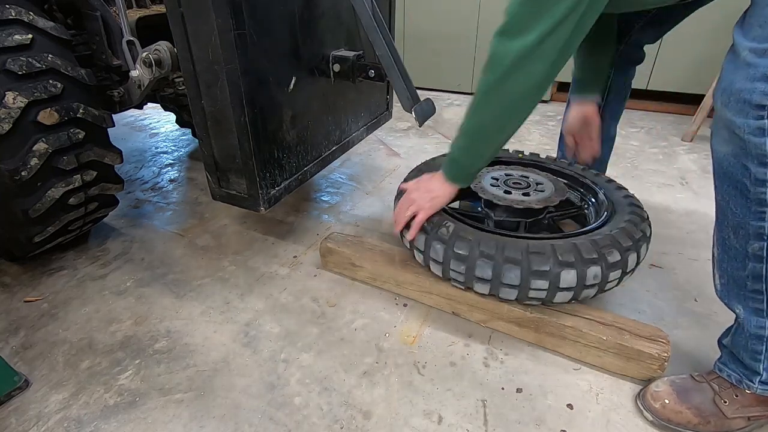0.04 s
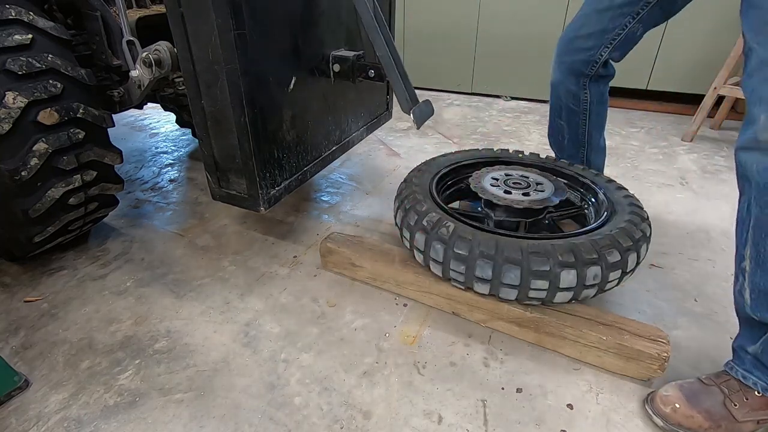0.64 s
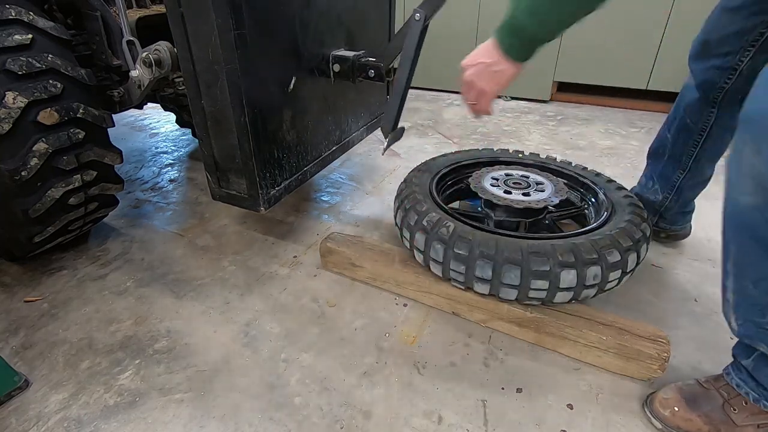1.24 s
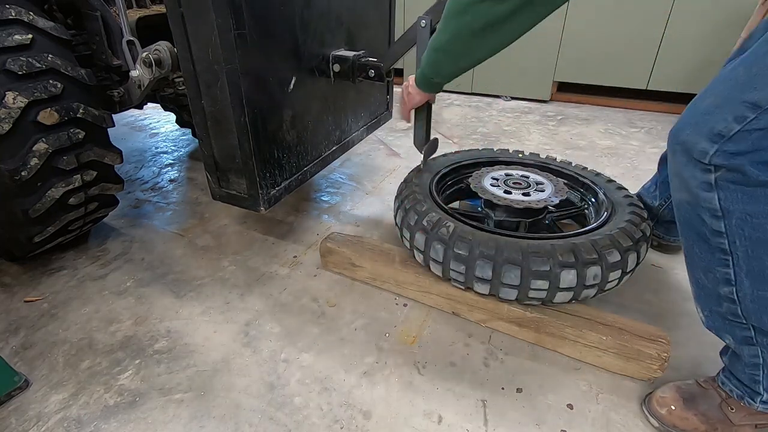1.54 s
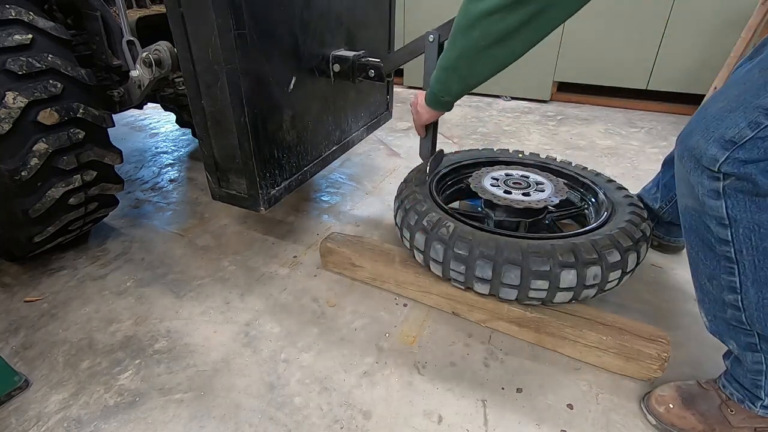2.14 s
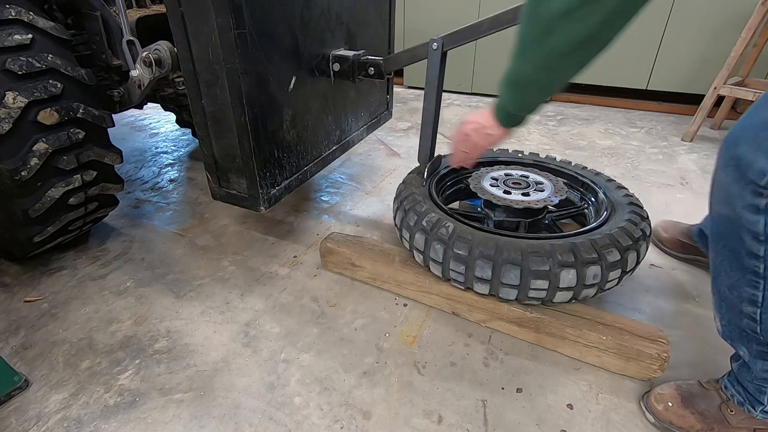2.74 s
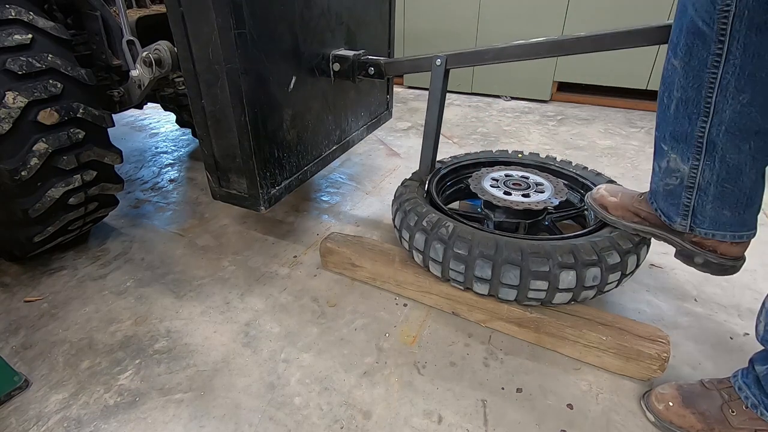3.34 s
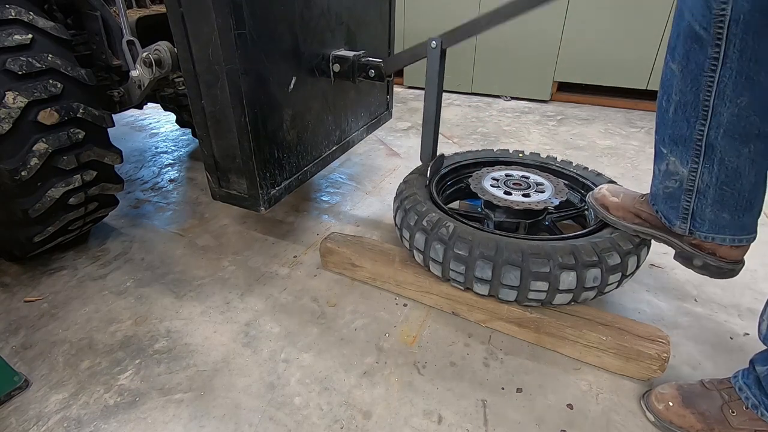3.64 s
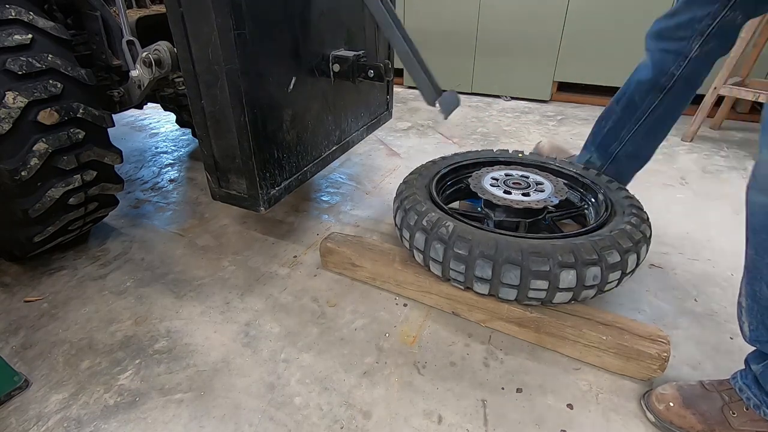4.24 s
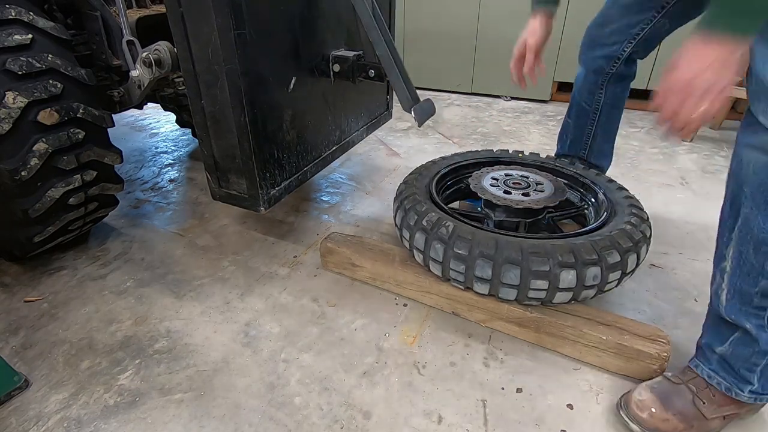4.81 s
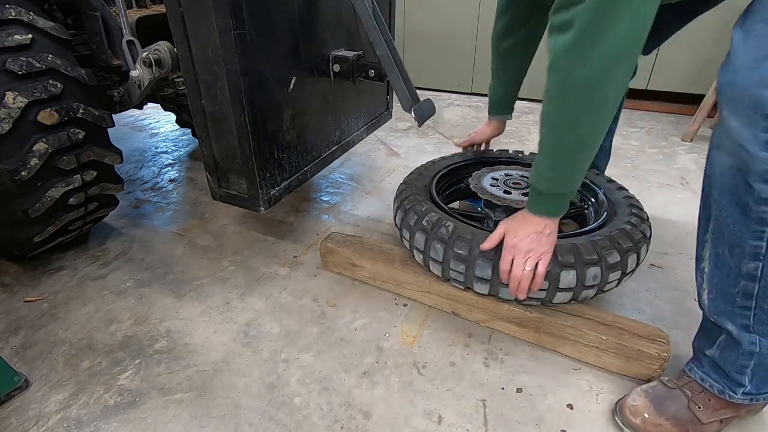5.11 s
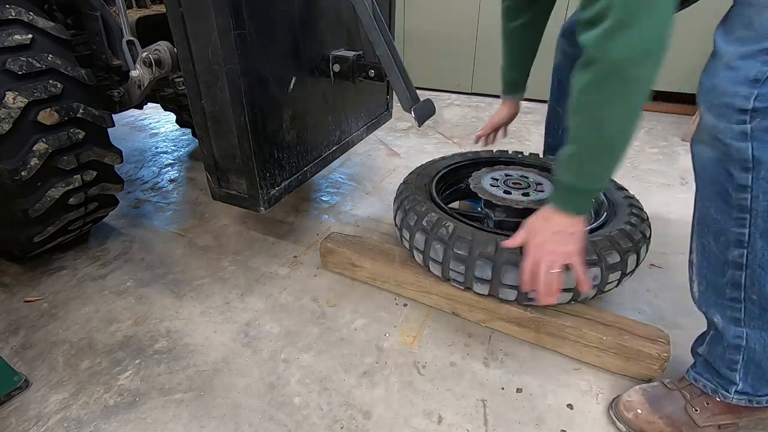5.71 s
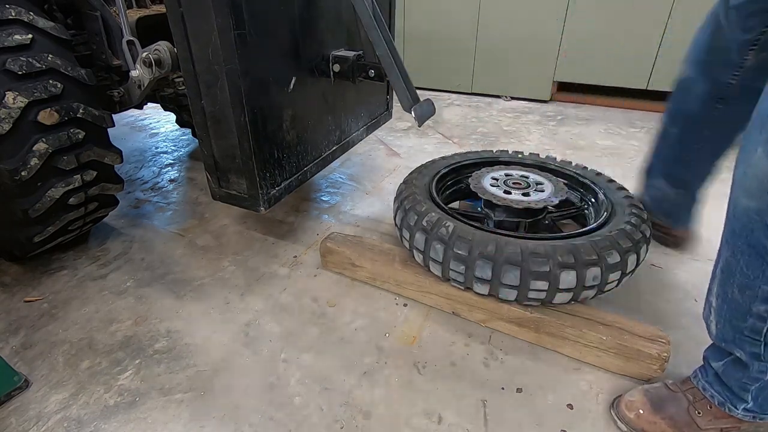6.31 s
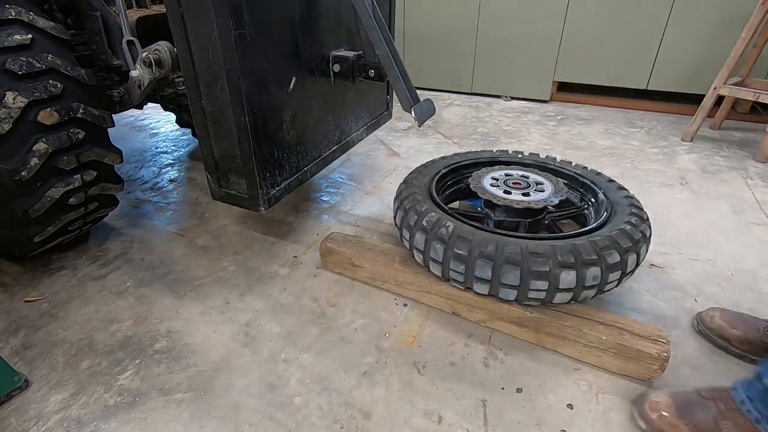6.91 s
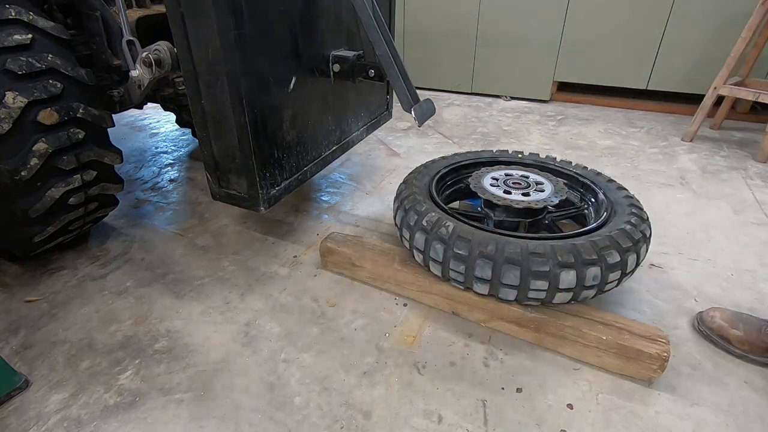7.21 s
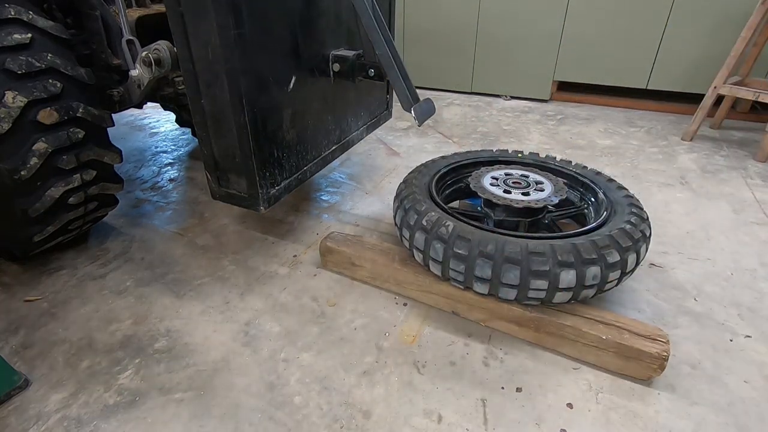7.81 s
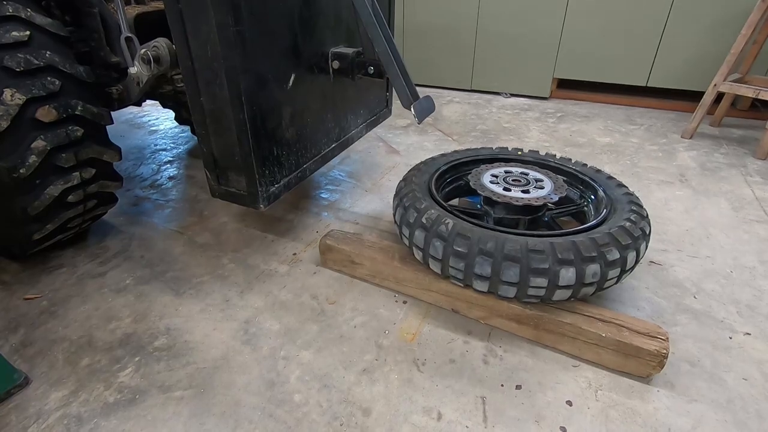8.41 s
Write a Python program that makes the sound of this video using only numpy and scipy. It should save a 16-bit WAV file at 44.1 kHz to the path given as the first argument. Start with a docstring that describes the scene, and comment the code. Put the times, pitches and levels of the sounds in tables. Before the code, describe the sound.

In a reverberant workshop, a wheel lands on wood with a sharp knock and a boom. Light clinks of a loose steel hinge lead into rubber creaking under a lever, with faint high whistles and a thud. The lever releases with a clank, then squeaks and bangs on a hollow steel box. Palms pat the tyre and boots scuff over concrete, before fingers scrape and tap right at the microphone.

```python
"""A knock and a hollow thump ring through a workshop: a motorcycle wheel drops on a wooden beam. A hinged steel
lever is pressed into the tyre; stick-slip friction makes the rubber creak and groan. Faint, very high tones
glide up and down across each other. The lever springs free, squeaks on its pivot and clanks against its steel
box, exciting the modes of both. Boots thud and scuff on concrete, denim swishes and palms slap the tyre. At the
end a hand rubs and taps the camera, close and mostly on the right."""
import sys
import numpy as np
from scipy import signal
from scipy.fft import rfft, irfft, next_fast_len
from scipy.io import wavfile
from scipy.ndimage import uniform_filter1d

SR = 44100
rng = np.random.default_rng(int(sys.argv[2]) if len(sys.argv) > 2 else 0)


def persist_wave(psi):
    """Save psi, clipped to +-1, as 16-bit WAV."""
    counts = np.round(np.clip(psi, -1, 1) * 32767).astype(np.int16)
    wavfile.write(sys.argv[1], SR, np.atleast_2d(counts).T)


N = 377055
TIME = np.arange(N) / SR
AGE = np.arange(SR) / SR  # the second that follows an impact

# spectra of loose steel joints, slipping rubber and a dull bump: f/Hz, level/dB
CHATTER_SPECTRUM = [(40, -43), (170, -5.5), (700, -4.5), (1300, -2), (2200, -1.5), (3300, -3.5), (5400, -3),
                    (7000, -14.5), (9300, -21), (11000, -38.5), (15000, -50.5)]
RUBBER_SPECTRUM = [(60, -45.5), (300, -14), (900, 3.5), (1400, -3), (2300, 0), (3400, 3), (4200, 0.5),
                   (5800, -4), (7500, -17.5), (10000, -22.5), (14000, -42)]
BUMP_SPECTRUM = [(20, -1.5), (55, -0.5), (100, -8.5), (250, -14), (600, -35), (2000, -68)]
# modes of the lever's steel foot, damped by the rubber: f/Hz, level/dB, t60/s
FOOT_MODES = [(1400, -5, .03), (2130, -6, .03), (2480, -7, .02), (3350, 0, .03), (4080, -1, .03),
              (4930, -6, .02)]


def undb(db):
    """Decibels to amplitude ratio."""
    return 10 ** (np.asarray(db) / 20)


def unit(x):
    """Normalise to rms 1."""
    return x / np.sqrt(np.mean(x ** 2))


def add(track, t, sound):
    """Superpose a sound on the track at time t."""
    start = max(int(t * SR), 0)
    track[start:start + len(sound)] += sound[:N - start]


def curve(rows, column=1):
    """Linear interpolation of a table column in time."""
    rows = np.array(rows)
    return np.interp(TIME, np.sort(rows[:, 0]), rows[:, column])


def swell(rows):
    """Envelope from rows of t/s, f/Hz, level/dB; silent outside them."""
    inside = (TIME >= rows[0][0]) & (TIME <= rows[-1][0])
    return undb(curve(rows, column=2)) * uniform_filter1d(inside * 1., size=200)


def fade(t60):
    """Exponential decay: 60 dB in t60 seconds."""
    return np.exp(-np.log(1000) * AGE / max(t60, .002))


def stroke(t, length_s, attack_s, t60):
    """Envelope of a sliding movement: linear rise, hold, exponential decay."""
    rise = np.clip((TIME - t) / attack_s, 0, 1)
    return rise * np.exp(-np.log(1000) * np.clip((TIME - t - length_s) / t60, 0, 10))


def strokes(rows, attack_s, t60):
    """Incoherent sounds add in power; rows of t/s, length/s, level/dB."""
    return np.sqrt(sum((undb(db) * stroke(t, length_s, attack_s, t60)) ** 2 for t, length_s, db in rows))


def wander(rate):
    """Smooth random fluctuation of rms 1, changing about rate times a second."""
    hold = int(SR / rate)
    steps = np.repeat(rng.standard_normal(N // hold + 1), hold)
    return unit(uniform_filter1d(steps, hold)[:N])


def slips(rate, scatter_db):
    """Stick-slip impulses with log-normal intervals and sizes."""
    gap, size = rng.standard_normal((20000, 2)).T
    at = (np.cumsum(np.exp(.5 * gap)) * SR / rate).astype(int)
    return np.bincount(at[at < N], undb(scatter_db * size[at < N]), N)


def shade(x, points):
    """Zero-phase filter through points of f/Hz, gain/dB."""
    size = next_fast_len(len(x))
    octave = np.log2(np.maximum(np.fft.rfftfreq(size, 1 / SR), 1))
    hz, db = np.transpose(points)
    gain = undb(np.interp(octave, np.log2(hz), db))
    return irfft(rfft(x, size) * gain, size)[:len(x)]


def colour(x, points, tilt_db=0):
    """Spectral shaping with an extra tilt in dB per octave; rms 1."""
    return unit(shade(x, [(hz, db + tilt_db * np.log2(hz)) for hz, db in points]))


def burst(points, t60, tilt_db=0):
    """Dense, short-lived modes, evenly excited, merge into decaying coloured noise."""
    envelope = fade(t60)
    spectrum = rfft(rng.standard_normal(SR) * envelope)
    white = irfft(spectrum / (np.abs(spectrum) + 1e-12), SR)
    strongest_hz = max(points, key=lambda p: p[1])[0]
    onset = 1 - np.exp(-(2 * AGE * strongest_hz) ** 2)  # takes about one cycle
    sound = colour(white, points, tilt_db) * fade(4 * t60) * onset
    return unit(sound) * np.sqrt(np.mean(envelope ** 2))


def ring(modes, pitch=1, contact_s=.0001):
    """Free vibration as a sum of damped sinusoids; a longer contact softens the onset."""
    hz, db, t60 = np.transpose(modes)
    gains = undb(db) / np.sqrt(np.sum(undb(db) ** 2) / 2) * (-1) ** np.arange(len(hz))
    sound = sum(g * np.sin(2 * np.pi * f * pitch * AGE) * fade(d) for f, g, d in zip(hz, gains, t60))
    return sound * (1 - np.exp(-(AGE / contact_s) ** 2))


def struck(modes, favoured_hz, focus_db, relative_width=.015):
    """The point of impact favours some modes over others."""
    def nearness(hz):
        return np.exp(-(np.log(hz / np.array(favoured_hz)) / relative_width) ** 2).max()
    return [(hz, db + focus_db * nearness(hz), t60) for hz, db, t60 in modes]


def resonate(x, modes, width_hz, lift_db):
    """Forced response of modes broadened by contact damping; the energy of x is kept."""
    size = next_fast_len(len(x))
    f = np.fft.rfftfreq(size, 1 / SR)
    peaks = sum(undb(db) / (1 + 2j * (f - hz) / width_hz) for hz, db, _ in modes)
    response = irfft(rfft(x, size) * (1 + undb(lift_db) * peaks), size)[:len(x)]
    return unit(response) * np.sqrt(np.mean(x ** 2))


def wheel(crack_db=-13):
    """Contact time sets the attack: the hard rim knocks on wood at once, the soft tyre booms later."""
    # landing and bounces: t/s, thump/dB, knock/dB, tyre pitch ratio, knock pitch ratio
    landings = [(.003, -22.5, -21, 0.93, 1.0), (0.0204, -9.5, -3, 0.87, 0.97), (0.06, -21.5, -29, .9, .9),
                (.097, -25, -26, 0.87, .9)]
    # modes of the tyre with its air, and of the rim on the beam: f/Hz, level/dB, t60/s
    tyre_modes = [(69.3, -8, 0.31), (90, -15, 0.34), (112, -11.5, 0.16), (163, -7, 0.2), (194, -2.5, 0.087),
                  (241.5, 3.5, 0.083), (341, -11, 0.12)]
    beam_modes = [(580, 0, 0.014), (790, 5, 0.013), (1010, 2, 0.015), (875, -13, 0.035)]
    # crack of the wood: f/Hz, level/dB
    crack_spectrum = [(40, -19), (150, 3), (420, 1), (800, 0), (1100, 1), (1500, -11), (2600, -15),
                      (3700, -14), (4500, -27), (6500, -28.5), (12000, -60.5)]
    out = np.zeros(N)
    for t, thump_db, knock_db, tyre_pitch, knock_pitch in landings:
        thump = ring(tyre_modes, tyre_pitch, contact_s=.0043)
        crack = burst([(hz * knock_pitch, db) for hz, db in crack_spectrum], t60=.034)
        knock = ring(beam_modes, knock_pitch, contact_s=.00083) + undb(crack_db) * crack
        add(out, t, undb(thump_db) * thump + undb(knock_db) * knock)
    return out


def denim(gain_db=-2, flutter_db=2.1):
    """A brief burst of noise just before the wheel lands; after it, friction noise of moving cloth."""
    # the opening burst (first row), then the swishes: t/s, length/s, level/dB
    noises = [(0, 0.0022, -25.5), (0.084, 0.63, -64), (0.503, 0.13, -62), (0.667, 1, -59.5),
              (0.975, 0.056, -52.5), (1.15, 0.13, -55), (1.31, 0.45, -58.5), (4.159, 0.12, -62),
              (4.377, 0.17, -54), (5.101, 0.24, -62.5), (5.33, 0.17, -55.5), (5.5, 0.27, -65),
              (6.091, 0.069, -61), (6.167, 0.283, -51.5), (6.45, 0.33, -54.5), (6.945, 0.053, -51.5),
              (7.222, 0.52, -69), (7.609, 0.14, -55), (7.77, 0.37, -51)]
    # their common spectrum: f/Hz, level/dB
    spectrum = [(50, -48), (100, -17), (160, 9), (300, 2), (700, 2), (1600, 2.5), (4000, 1), (6000, 0.5),
                (7500, -11), (9300, -11.5), (11000, -27), (15000, -37.5)]
    gain = undb(gain_db + flutter_db * wander(45)) * strokes(noises, attack_s=.039, t60=.091)
    return gain * colour(rng.standard_normal(N), spectrum)


def room_air(level_db=-75, drift_db=.78):
    """Broadband background noise, faint and nearly steady."""
    # room tone: f/Hz, level/dB
    air_spectrum = [(30, -12), (100, -13), (200, -1), (600, -9), (2000, -12.5), (5500, -11), (9000, -24.5),
                    (13000, -51.5)]
    return undb(level_db + drift_db * wander(13)) * colour(rng.standard_normal(N), air_spectrum)


def workshop(x, build_s=.028, early_db=-9, early_t60=.17):
    """Reverberation: floor and machines reflect first, then the diffuse field builds and decays."""
    # the room: f/Hz, t60/s, late level/dB, left-right correlation
    room_bands = [(61.4, 0.049, -5, 1), (142, 0.47, -9, 0.93), (245, 0.77, -4.5, 0.93),
                  (610, 0.92, -5.5, 0.6), (1080, 0.94, -3, 0.2), (2030, 0.91, -4.5, 0.7),
                  (5200, 0.72, -6, 0.3), (9500, 0.37, 2.5, 0)]
    hz, *columns = np.transpose(room_bands)
    centres = np.log2(62.5) + np.arange(17) / 2  # half-octave bands
    octave = np.log2(np.maximum(np.fft.rfftfreq(SR, 1 / SR), 1))
    noise = rfft(rng.standard_normal((2, SR)))
    early = undb(early_db) * unit(fade(early_t60) * (AGE > .003))
    response = np.zeros((2, SR))
    for centre, band in zip(centres, np.eye(len(centres))):
        t60, late_db, alike = (np.interp(centre, np.log2(hz), c) for c in columns)
        mid, side = irfft(noise * np.interp(octave, centres, band), SR)
        pair = np.sqrt((1 + alike) / 2) * mid + np.sqrt((1 - alike) / 2) * np.array([side, -side])
        late = undb(late_db) * unit(fade(t60) * (1 - np.exp(-AGE / build_s)))
        response += pair * np.hypot(late, early) / np.sqrt(SR)
    return signal.fftconvolve(x[None], response, axes=1)[:, :N]


def wavering_tone(hz, gain, waver, overtones_db=(), flutter_db=2):
    """A tone under random frequency and amplitude modulation."""
    phase = 2 * np.pi * np.cumsum(hz * (1 + waver * wander(500))) / SR
    tone = np.sin(phase) + sum(undb(db) * np.sin(k * phase) for k, db in enumerate(overtones_db, 2))
    return tone * gain * undb(flutter_db * wander(120))


def pivot_and_high_tones():
    """Dry friction makes the hinge hum, squeak and whistle; apart from it, faint, very high tones glide up and
    down across each other."""
    # the falling lever's squeak and the swung arm's hum: t/s, f/Hz, level/dB
    squeak = [(4.34, 1897, -66), (4.366, 1850, -41), (4.377, 1784, -26.5), (4.388, 1686, -38),
              (4.408, 1727, -44.5)]
    hum = [(1.42, 290, -65), (1.53, 274.8, -53.5), (1.61, 258, -51), (1.68, 262.3, -66), (1.82, 271.6, -52),
           (1.9, 263.8, -54), (2.15, 267, -69)]
    # high tones: t/s, length/s, starting f/Hz, final f/Hz, level/dB; those at 11-13 kHz glide up and down
    # across each other
    glides = [(0.877, 0.5, 5800, 5950, -67), (2.564, 0.036, 5070, 5260, -41),
              (2.61, 0.14, 8480, 8540, -41.5), (2.845, 0.064, 8670, 9100, -37),
              (2.88, .12, 11100, 12200, -45), (2.891, 0.14, 12700, 11780, -48),
              (2.99, 0.049, 12000, 10920, -46), (2.994, 0.033, 12100, 13100, -55),
              (3.014, 0.071, 8940, 8330, -46.5), (3.058, 0.022, 4800, 5010, -45),
              (4.56, 0.016, 5520, 5350, -27.5), (4.583, 0.0095, 5700, 5300, -25)]
    out = wavering_tone(curve(squeak), swell(squeak), waver=.0091, overtones_db=(-7, -30))
    out += wavering_tone(curve(hum), swell(hum), waver=.039)
    for t, length_s, from_hz, to_hz, db in glides:
        progress = np.clip((TIME - t) / length_s, 0, 1)
        glide_hz = from_hz + (to_hz - from_hz) * progress
        out += wavering_tone(glide_hz, undb(db) * np.sin(np.pi * progress), waver=.012)
    return out


def hinge_pin(chatter_db=-7, ring_db=-5, contact_s=.00017):
    """Impacts across a clearance: the loose pin knocks in its hole and rings the arm."""
    # clinks: t/s, level/dB, two favoured modes f/Hz, chatter t60/s
    clinks = [(0.921, -40, 2070, 1945, 0.051), (1.117, -43, 4560, 3810, 0.029),
              (1.386, -33.5, 3345, 5390, 0.15), (1.719, -32.5, 3345, 2070, 0.12),
              (1.778, -36, 2070, 1350, 0.082), (1.82, -28.5, 1945, 3020, 0.15),
              (1.821, -30, 5390, 1350, 0.068), (2.419, -37.5, 3345, 1350, 0.15),
              (2.44, -35.5, 3345, 1350, 0.095), (2.465, -35.5, 3810, 3345, 0.12),
              (3.284, -36, 2070, 810, 0.18), (3.741, -31.5, 3020, 3810, 0.07)]
    # modes of the hinged arm: f/Hz, level/dB, t60/s
    arm_modes = [(265, -25, .9), (810, -7, .05), (1350, -10, .08), (1945, -6, .03), (2070, -10, .04),
                 (2830, -6, .045), (3020, -6.5, .026), (3345, -3.5, .045), (3810, -9, .04),
                 (4560, -7, .025), (5160, -9, .05), (5390, -10.5, .036), (7430, -26, .12)]
    onset = 1 - np.exp(-AGE / contact_s)
    out = np.zeros(N)
    for t, db, first_hz, second_hz, t60 in clinks:
        modes = struck(arm_modes, [first_hz, second_hz], focus_db=13.5)
        chatter = resonate(burst(CHATTER_SPECTRUM, t60, tilt_db=-1), modes, width_hz=250, lift_db=8)
        clink = undb(chatter_db) * chatter + undb(ring_db) * ring(modes)
        add(out, t, undb(db) * clink * onset)
    return out


def boots(heel_db=-3, scuff_db=-5, thud_db=-4, heel_t60=.13):
    """Impact and friction on concrete: heels thud, soles scuff and drag, grit crunches."""
    # footfalls: t/s, level/dB, scuff trim/dB, thud trim/dB, heel pitch ratio
    steps = [(1.173, -34.5, -13, -28, 1.2), (2.79, -38, -23, -20, 1.43), (4.435, -39.5, -24, 1.5, 0.73),
             (6.183, -57.5, 10.5, -15, 1.03), (6.228, -47, -10, -15, 1.33), (6.461, -28.5, -12, -12, 1.25),
             (6.763, -34.5, -2.5, -21, 1.1), (7.565, -36.5, -19.5, -12, 0.96),
             (8.015, -35.5, -9.5, -15, 0.86)]
    # dragging soles: t/s, length/s, level/dB
    drags = [(2.745, 0.084, -46.5), (6.47, 0.24, -53.5), (7.0, 0.11, -54.5)]
    # grit underfoot: t/s, level/dB
    crunches = [(0.991, -49), (1.029, -49.5), (6.185, -49), (7.668, -43)]
    # spectra of heel and sole: f/Hz, level/dB
    heel_spectrum = [(40, -46), (95, -12), (140, 6.5), (250, 2), (370, -2), (700, -12), (2000, -25.5),
                     (6000, -43.5)]
    scuff_spectrum = [(300, -4.5), (1600, 6.5), (3500, 5), (6000, 3.5), (9300, -8.5), (10800, -25),
                      (15000, -35.5)]
    out = colour(rng.standard_normal(N), scuff_spectrum, tilt_db=4)
    out *= strokes(drags, attack_s=.011, t60=.096)
    for t, db, scuff_trim, thud_trim, pitch in steps:
        heel = undb(heel_db) * burst([(hz * pitch, level) for hz, level in heel_spectrum], heel_t60)
        thud = undb(thud_db + thud_trim) * burst(BUMP_SPECTRUM, heel_t60)
        scuff = undb(scuff_db + scuff_trim) * burst(scuff_spectrum, t60=.36)
        add(out, t, undb(db) * (heel + thud + scuff))
    for t, db in crunches:
        add(out, t, undb(db) * burst(scuff_spectrum, t60=.023))
    return out


def rubber_creak(slack_hz=186.4, load_rise_hz=64.8, slack_db=-20, load_rise_db=28.5):
    """Stick-slip under the foot shakes the carcass; the tyre groans higher and louder with load."""
    # force on the lever: t/s, share of full load
    loading = [(2.42, 0.11), (2.87, 0.43), (3.1, 0.73), (3.42, 0.97), (3.68, .9), (3.76, 0.6)]
    # the foot slides over the sidewall: t/s, length/s, creak/dB, carcass rub/dB
    slides = [(2.42, 0.31, -55, -59), (2.757, 0.082, -60, -52), (2.805, 0.11, -42.5, -43.5),
              (2.955, 0.49, -53, -57), (3.047, 0.07, -50, -44), (3.293, 0.11, -49, -39.5),
              (3.543, 0.16, -46, -56)]
    # response of the carcass: f/Hz, level/dB
    carcass_spectrum = [(50, -45), (100, -24), (145, 1), (330, 0), (560, 0), (830, 1), (1050, -9),
                        (2000, -22), (6000, -45)]
    jerks = signal.fftconvolve(slips(rate=150, scatter_db=2.8), fade(.04))[:N] * rng.standard_normal(N)
    sliding, rubbing = 0, 0
    for t, length_s, creak_db, rub_db in slides:
        gain = stroke(t, length_s, attack_s=.03, t60=.091)
        sliding = np.hypot(sliding, undb(creak_db) * gain)
        rubbing = np.hypot(rubbing, undb(rub_db) * gain)
    load = curve(loading)
    groan_hz = (slack_hz + load_rise_hz * load) * (1 + .05 * wander(60))
    groan_db = slack_db + load_rise_db * load + 3.5 * wander(70)
    groan = undb(groan_db) * np.sin(2 * np.pi * np.cumsum(groan_hz) / SR)
    creak = undb(-2) * resonate(colour(jerks, RUBBER_SPECTRUM), FOOT_MODES, width_hz=250, lift_db=-9.5)
    carcass = undb(-1) * colour(jerks, carcass_spectrum)
    return (creak + groan) * sliding + carcass * rubbing


def lever_foot(ring_db=-6):
    """Impulse excitation: each large slip ticks in the damped steel foot."""
    # the foot catches and lets go: t/s, level/dB
    jerks = [(2.512, -43.5), (2.545, -39), (2.695, -45.5), (2.876, -42.5), (2.926, -37.5), (2.95, -38.5),
             (2.98, -37.5), (3.059, -41), (3.085, -36.5), (3.107, -40.5), (3.155, -45.5), (3.339, -41.5),
             (3.362, -41.5), (3.4, -41.5), (3.547, -37.5), (3.586, -40.5)]
    ringing = undb(ring_db) * ring(FOOT_MODES, contact_s=.00079)
    out = np.zeros(N)
    for t, db in jerks:
        tick = resonate(burst(RUBBER_SPECTRUM, t60=.024), FOOT_MODES, width_hz=210, lift_db=-.5)
        add(out, t, undb(db) * (tick + ringing))
    return out


def stamp():
    """A soft impact: a sole thuds on the tyre and excites the damped modes of the clamped wheel."""
    # the boot comes down: t/s, level/dB
    stamps = [(3.304, -15.5)]
    # modes of the wheel between boot and beam: f/Hz, level/dB, t60/s
    clamped_modes = [(248, -4, 0.094), (318, -1, 0.06), (407, -11.5, 0.028), (567, 3.5, 0.029),
                     (720, -2.5, 0.031), (860, -4, 0.05), (1190, -15, 0.065)]
    out = np.zeros(N)
    for t, db in stamps:
        add(out, t, undb(db) * ring(clamped_modes, contact_s=.0013))
    return out


def sidewall_flex():
    """A slow push excites only the low modes of the soft sidewall."""
    # the bead gives way or a weight leans on the tyre: t/s, level/dB
    flexes = [(3.315, -25.5), (3.564, -35), (3.674, -38), (5.478, -30)]
    # sidewall modes: f/Hz, level/dB, t60/s
    sidewall_modes = [(52, -5, .1), (93, 0, .13), (145, -3, .13)]
    out = np.zeros(N)
    for t, db in flexes:
        add(out, t, undb(db) * ring(sidewall_modes, contact_s=.022))
    return out


def lever_clanks():
    """Hard impacts excite high modes: the freed lever strikes steel, rings and chatters at its joints."""
    # blows: t/s, level/dB, tilt/(dB/octave), two favoured modes f/Hz, chatter t60/s, relative ring/dB
    clanks = [(3.757, -21.5, -2, 3030, 775, 0.017, -6.5), (3.7635, -14.5, 3, 3450, 5150, 0.12, -6.5),
              (3.872, -30, 0.5, 3450, 4410, 0.41, 0), (4.5157, -13.5, 2.5, 3260, 3030, 0.052, -6),
              (4.518, -23.5, 4, 5510, 4186, 0.061, 2.5), (4.604, -17, -1.5, 3030, 1490, 0.2, -5),
              (4.733, -23.5, -0.5, 1490, 2230, 0.32, -36), (4.739, -21.5, 4, 3852, 3290, 0.07, -9)]
    # modes of the lever with its foot: f/Hz, level/dB, t60/s
    lever_modes = [(775, -12, .08), (1110, -16, .08), (1490, -12, .09), (1975, -7, .06), (2234, -7.5, .06),
                   (2417, -8, .14), (3030, -6, .03), (3270, -4, .04), (3450, -9, .24), (3852, -10, .3),
                   (4186, -6, .04), (4385, -8, .17), (4500, -13, .05), (4975, -11, .09), (5150, -11, .09),
                   (5275, -10, .09), (5510, -10, .13), (5845, -11, .14), (6420, -11, .07), (7460, -21, .14),
                   (7630, -21, .14)]
    out = np.zeros(N)
    for t, db, tilt_db, first_hz, second_hz, t60, ring_db in clanks:
        modes = struck(lever_modes, [first_hz, second_hz], focus_db=5.5)
        chatter = resonate(burst(CHATTER_SPECTRUM, t60, tilt_db), modes, width_hz=95, lift_db=7)
        add(out, t, undb(db) * (chatter + undb(ring_db) * ring(modes)))
    return out


def steel_box(rattle_db=-2):
    """Plate vibration: the hollow box booms and rattles as the arm bounces on it."""
    # bounces: t/s, level/dB
    bounces = [(4.605, -27.5), (4.66, -28.5), (4.787, -28)]
    # panel modes: f/Hz, level/dB, t60/s
    panel_modes = [(85, -8, .14), (262, 12, .17), (457, 7, .27), (543, 10, .22), (630, 1, .2),
                   (800, 4, .12), (1071, 2, .2), (1362, -1, .25), (1491, -1, .25)]
    # rattle of the box: f/Hz, level/dB
    rattle_spectrum = [(60, 3), (200, 3), (500, 21), (1000, 7.5), (2200, -11), (4500, -27.5), (7000, -18),
                       (14000, -78.5)]
    boom = ring(panel_modes, contact_s=.0011)
    out = np.zeros(N)
    for t, db in bounces:
        add(out, t, undb(db) * (boom + undb(rattle_db) * burst(rattle_spectrum, t60=.3)))
    return out


def palms():
    """Heavily damped impacts: palms on the tyre give short, dull slaps."""
    # slaps: t/s, level/dB
    slaps = [(5.451, -29.5), (5.478, -32.5), (5.601, -33)]
    # skin on rubber: f/Hz, level/dB
    slap_spectrum = [(30, -38), (65, -5), (160, 3.5), (245, 7), (320, -12), (450, -14.5), (900, -21.5),
                     (2000, -30), (9000, -60)]
    out = np.zeros(N)
    for t, db in slaps:
        add(out, t, undb(db) * burst(slap_spectrum, t60=.05))
    return out


def fingers(lift_hz=3960, lift_octaves=.71):
    """Structure-borne sound: skin rasps and taps on the camera's case beside a microphone port."""
    # rubs: t/s, length/s, level/dB, tilt/(dB/octave), treble lift of a flat fingertip/dB
    rubs = [(7.895, 0.053, -41.5, -1, 1), (7.97, .26, -52.5, 1, 4), (8.076, 0.059, -30, -3, 7),
            (8.245, 0.038, -25.5, 0.5, -0.5), (8.285, 0.051, -31, -2.5, -1.5),
            (8.334, 0.039, -26, -1.5, -5), (8.408, 0.097, -40, -5.5, 7.5)]
    # taps: t/s, click/dB, case ring/dB, low bump/dB, tilt/(dB/octave)
    taps = [(7.971, -19.5, -38, -31, -6.5), (8.141, -17, -26.5, -42.5, -3),
            (8.248, -22, -61.5, -47.5, -4.5), (8.369, -56, -70.5, -46, -3),
            (8.408, -29.5, -39.5, -47.5, -4)]
    # skin on the case: f/Hz, level/dB
    skin_spectrum = [(180, -44), (300, -62), (484, -27.5), (1050, -18.5), (1700, 4), (2150, -2.5),
                     (2800, -12), (3500, -8.5), (4420, -8.5), (5210, 4), (5900, 1.5), (6650, -11),
                     (7200, -4), (7950, -13), (9660, -5), (10800, -22.5), (14300, -28), (15500, -46)]
    # case modes: f/Hz, level/dB, t60/s
    case_modes = [(696.5, -7, 0.12), (1690, -4.5, 0.042)]
    rasp = rng.standard_normal(N) + .35 * unit(slips(rate=1500, scatter_db=3))
    rasp *= undb(wander(110))
    out = np.zeros(N)
    for t, length_s, db, tilt_db, lift_db in rubs:
        lifted = [(hz, level + lift_db * np.exp(-(np.log2(hz / lift_hz) / lift_octaves) ** 2))
                  for hz, level in skin_spectrum]
        out += undb(db) * colour(rasp, lifted, tilt_db) * stroke(t, length_s, attack_s=.01, t60=.087)
    for t, click_db, ring_db, bump_db, tilt_db in taps:
        click = undb(click_db) * burst(skin_spectrum, t60=.022, tilt_db=tilt_db)
        ringing = undb(ring_db) * ring(case_modes, contact_s=.0015)
        bump = undb(bump_db) * burst(BUMP_SPECTRUM, t60=.26)
        add(out, t, click + ringing + bump)
    return out


def hand(near_db=4, incoherent_db=-1, case_lag_s=.00027):
    """Transmission through the case: the hand at the right port reaches the left late and filtered."""
    # response at the far port: f/Hz, gain/dB
    far_response = [(60, -17.5), (150, 4.5), (700, -10), (1400, -0.5), (2400, 3), (4400, -5.5),
                    (8100, -17.5), (15000, -2)]
    near = fingers()
    delayed = np.interp(TIME - case_lag_s, TIME, near)
    far = shade(delayed + undb(incoherent_db) * fingers(), far_response)
    return np.array([far, undb(near_db) * near])


def scene():
    """Direct sound and reverberation superpose; only the hand on the camera stays dry."""
    sources = [  # signal, send to the room/dB
        (wheel() + sidewall_flex(), 8),
        (stamp(), 3),
        (lever_clanks() + steel_box(), 4),
        (hinge_pin() + rubber_creak() + lever_foot(), 2),
        (pivot_and_high_tones(), -5),
        (denim() + boots() + palms(), 4.5),
        (room_air(), 0),
    ]
    direct = sum(sound for sound, _ in sources)
    echo = workshop(sum(undb(send_db) * sound for sound, send_db in sources))
    return direct + echo + hand()


def record(dry, top_hz=15600):
    """Band limiting: a steep low-pass cuts the highest treble."""
    return signal.sosfilt(signal.ellip(8, .2, 70, top_hz, fs=SR, output="sos"), dry)


dry = scene()
out = record(dry)
persist_wave(out)
```